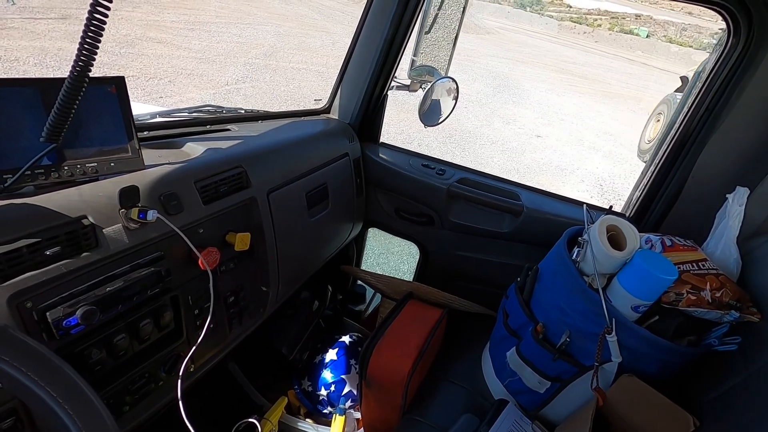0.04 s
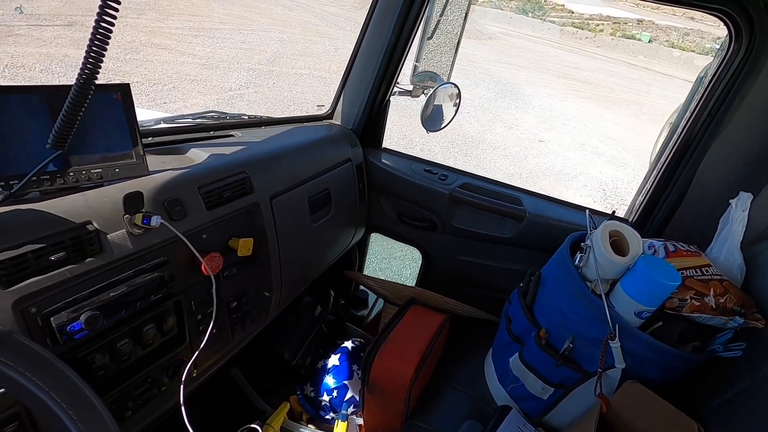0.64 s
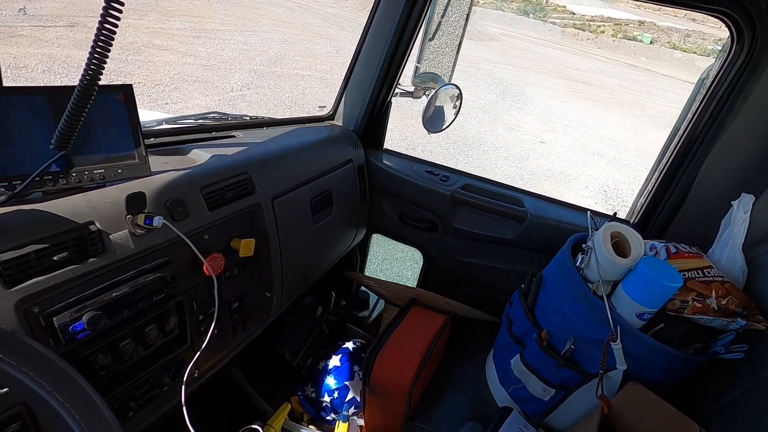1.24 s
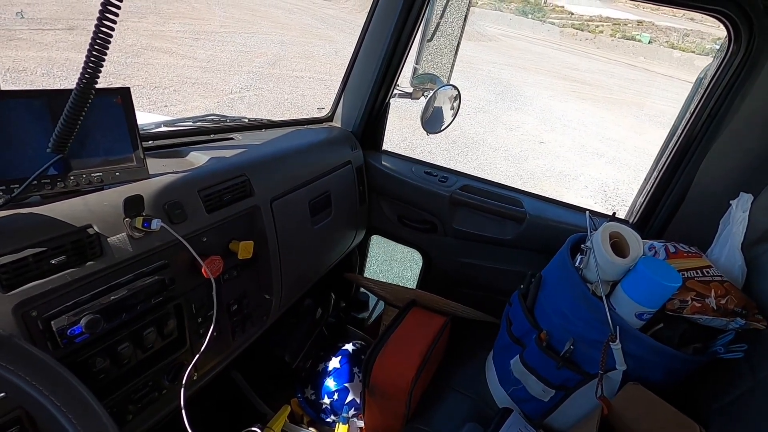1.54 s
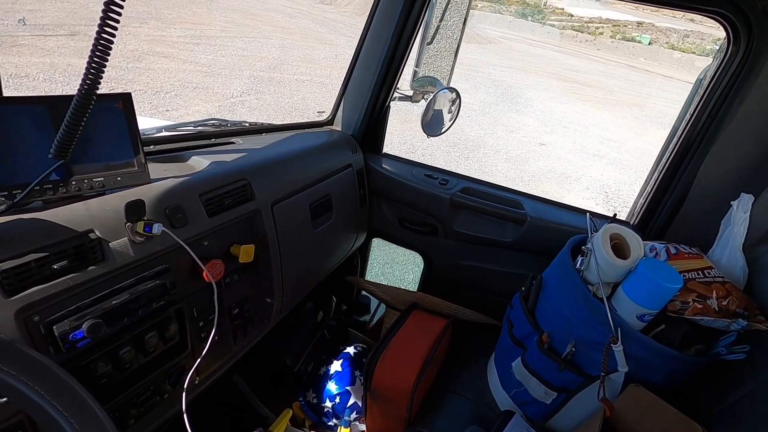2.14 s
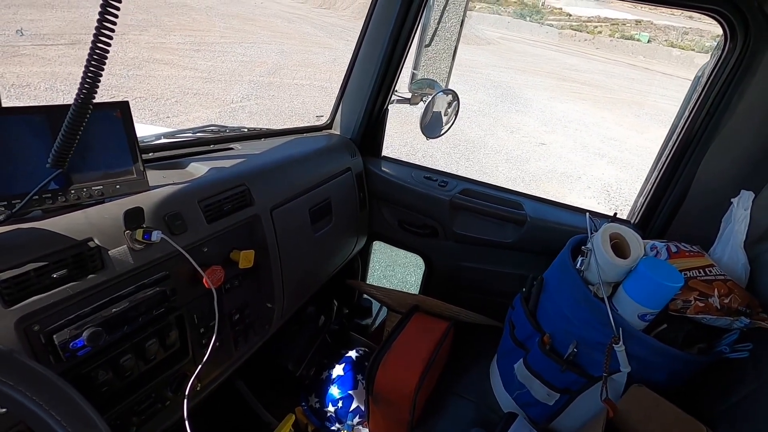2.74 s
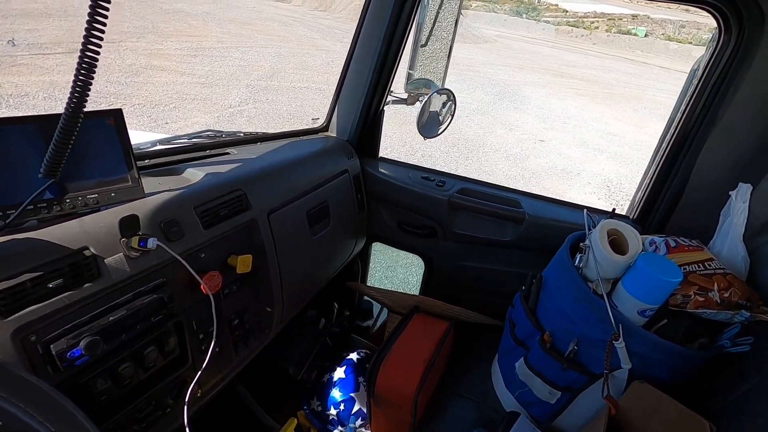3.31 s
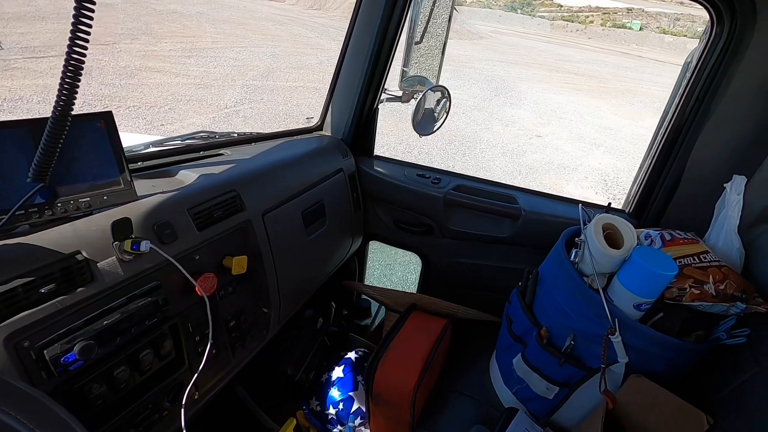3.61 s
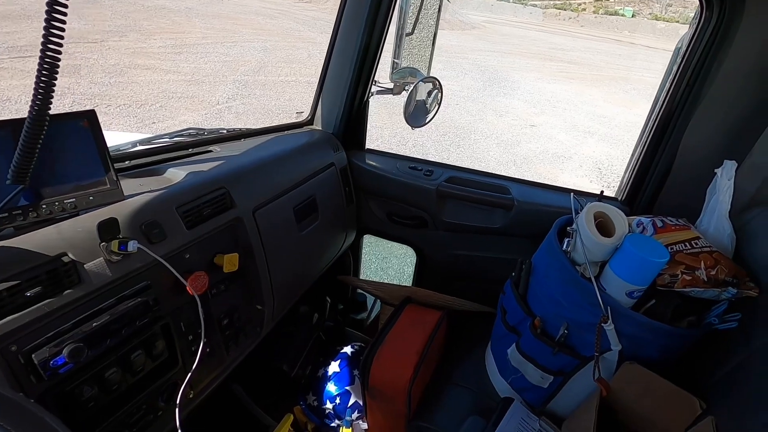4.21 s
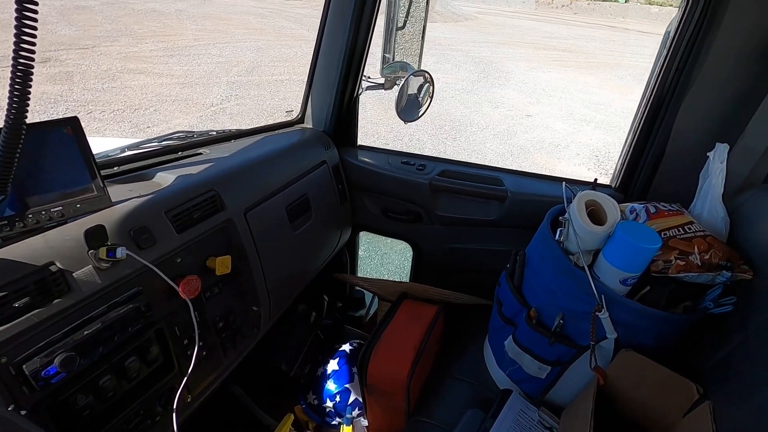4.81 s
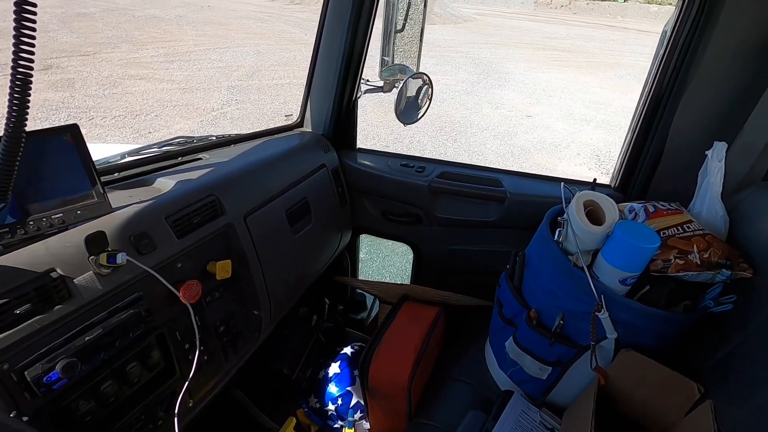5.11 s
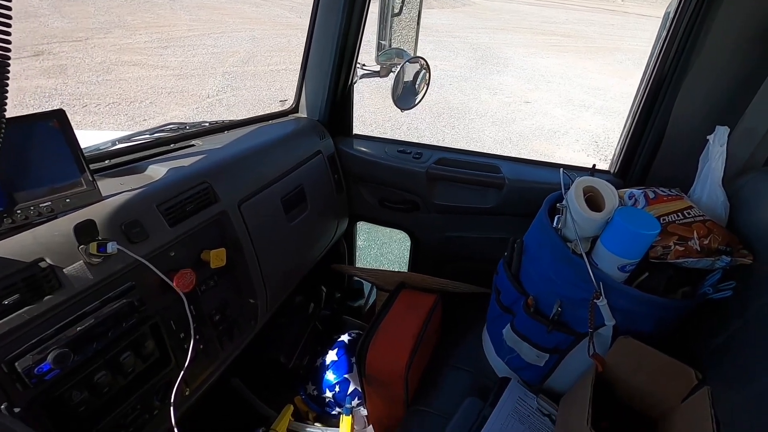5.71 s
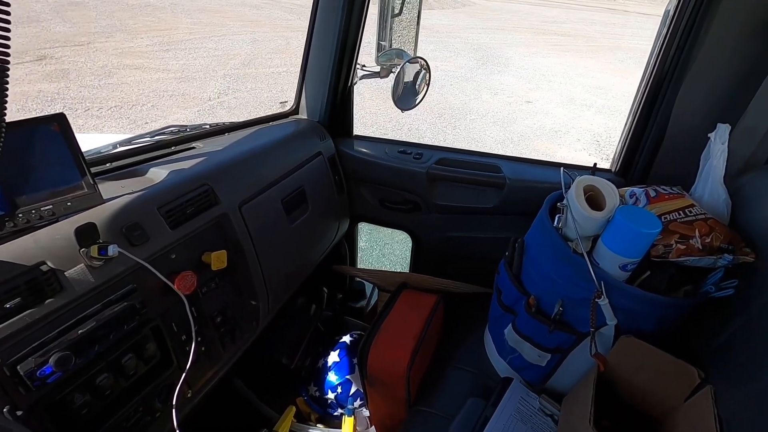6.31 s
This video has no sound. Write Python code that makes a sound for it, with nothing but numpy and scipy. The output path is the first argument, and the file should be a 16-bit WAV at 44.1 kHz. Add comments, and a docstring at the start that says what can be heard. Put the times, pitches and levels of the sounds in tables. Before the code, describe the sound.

A heavy diesel truck idles, heard from within the cab as a booming low hum with regular knocking and faintly ringing panels. Underneath, a nearby loader's engine drops in revs and picks up a little. Loose items give a soft knock, a rustle and scattered light ticks. Late on, a cooling fan engages with a low whoosh, and a close, fluttering air hiss builds.

```python
"""A six-cylinder diesel truck idles at a gravel pit, heard from inside the cab.
Its firings boom low, knock through the firewall and ring the block and panels; one cylinder is loudest.
A loader works nearby: its exhaust drone sinks and rises and beats against the truck's own firing note.
Loose things tick, rustle and knock in the cab. Near the end a fan cuts in and drags the idle for a
moment, and air starts to hiss through a valve and pipe."""
import sys
import numpy as np
from scipy import signal
from scipy.fft import rfft, irfft
from scipy.io import wavfile
from scipy.ndimage import uniform_filter1d

SR = 44100
rng = np.random.default_rng(int(sys.argv[2]) if len(sys.argv) > 2 else 0)


def digitize_waveform(pressure):
    """Quantize a signal to 16-bit integers and store it at the path in sys.argv[1].

    Rows of a 2-D input are taken as channels; values are limited to [-1, 1].
    """
    field = np.atleast_2d(pressure).T
    bounded = np.clip(field, -1, 1)
    quanta = np.round(bounded * 32767).astype(np.int16)
    wavfile.write(sys.argv[1], SR, quanta)


N = 280035
T, HZ = np.arange(N) / SR, np.maximum(np.fft.rfftfreq(N, 1 / SR), 1)
SIDES = np.array([[.5], [-.5]])   # splits a difference between left and right
CYLINDERS = 6


def from_db(db):
    """Decibels to gain."""
    return 10 ** (np.asarray(db) / 20)


def rms_one(x):
    """Scale to rms 1."""
    return x / np.sqrt(np.mean(x ** 2) + 1e-20)


def lookup(x, curve, left=None):
    """Read a breakpoint curve at x."""
    return np.interp(x, *np.transpose(curve), left=left)


def by_hz(curve):
    """An EQ curve at every frequency, straight on a log axis."""
    hz, value = np.transpose(curve)
    return np.interp(np.log(HZ), np.log(hz), value)


def envelope(start_s, attack_s, hold_s, release_s):
    """Rise, hold, then die away."""
    age = T - start_s
    return np.clip(age / attack_s, 0, 1) * np.exp(-np.maximum(age - attack_s - hold_s, 0) / release_s)


def drift(rate_hz):
    """A smooth random modulator of rms 1."""
    return rms_one(irfft(rfft(rng.standard_normal(N)) / (1 + (HZ / rate_hz) ** 4), N))


def white():
    """Two unrelated white noises."""
    return rng.standard_normal((2, N))


# stereo image in the cab: f/Hz, left-right correlation
LIKENESS = [(80, 1), (150, .99), (350, .97), (640, .92), (1200, .9), (2900, .87), (4500, .35), (10000, .05)]
def colour(source, eq=None):
    """Shape two noises into a stereo pair of rms 1, centred in the bass and wide in the treble."""
    mid, side = rfft(source)
    alike = by_hz(LIKENESS)
    pair = np.sqrt(1 + alike) * mid + np.sqrt(1 - alike) * side * [[1], [-1]]
    return rms_one(irfft(pair * (from_db(by_hz(eq)) if eq else 1), N))


def noise(eq=None):
    """Steady stereo noise."""
    return colour(white(), eq)


def resonate(drive, modes):
    """Parallel resonators, each at its own rms level; two stages keep the valleys dark."""
    out = 0
    for hz, width_hz, level_db in modes:
        ring = drive
        for width in (width_hz, 5 * width_hz):
            r = np.exp(-np.pi * width / SR)
            ring = signal.lfilter([1, 0, -1], [1, -2 * r * np.cos(2 * np.pi * hz / SR), r * r], ring)
        out = out + from_db(level_db) * rms_one(ring)
    return out


def shaken(modes, shake):
    """Each mode wanders in pitch about its centre and swells with the shaking."""
    out = 0
    for hz, width_hz, level_db in modes:
        phase = 2 * np.pi * np.cumsum(hz + width_hz / 2 * drift(width_hz)) / SR
        out = out + from_db(level_db + 1.8 * drift(35)) * np.sqrt(2) * np.sin(phase)
    return out * shake


# the truck's idle, sagging as the fan grips: t/s, firing rate/Hz
IDLE = [(0, 38.75), (5.1, 38.75), (5.22, 37.3), (5.35, 38.75), (5.5, 39.5), (5.85, 39.45), (6.0, 38.9),
        (6.35, 38.85)]
def crankshaft(first_firing_s=.009):
    """The engine's clock: firing rate and running count of firings."""
    rate = lookup(T, IDLE)
    return rate, np.cumsum(rate) / SR - first_firing_s * rate[0]


def bursts(firings, cylinder_db, decay, rise, uneven_db=2):
    """Each firing swells and dies away, as strong as its cylinder; times in firing intervals."""
    number, age = np.floor(firings).astype(int), firings % 1
    count = number.max() + CYLINDERS
    strength = from_db(np.resize(cylinder_db, count) + uneven_db * rng.standard_normal(count))
    shape = lambda a: np.exp(-a / decay) * (1 - np.exp(-a / rise))
    return rms_one(sum(strength[number - k] * shape(age + k) for k in range(3)))


def contacts(firings, share):
    """Contacts come back at the same crank angles every cycle; the rest of the noise is fresh."""
    loop_sample = (firings % CYLINDERS * SR / IDLE[0][1]).astype(int)
    return share * white()[:, loop_sample] + (1 - share) * white()


# partials of the hum: multiple of the four-stroke cycle rate, level/dB
HUM_ORDERS = [(3, -35), (4, -39), (6, -22.5), (12, -31), (18, -51), (21, -53), (30, -52.5), (54, -52.5),
              (60, -58.5), (90, -58), (95, -60.5)]
def truck_hum(firings, load):
    """The firing pulses boom in the cab as nearly pure engine orders, a touch softer under load."""
    cycle, out = firings / CYLINDERS, 0
    for order, level_db in HUM_ORDERS:
        waver_db = (.95 if order < 15 else 2.5) * drift(3.1)
        out = out - from_db(level_db + waver_db) * np.sqrt(2) * np.cos(2 * np.pi * order * cycle)
    return from_db(-1.03 - .7 * load) * out


# accents in firing order: knock level/dB, block ring level/dB, panel boom level/dB
ACCENTS = [(-11, -3, 0), (-3.5, -5, -2), (-8, 1.5, -3.5), (3, 0.5, -4.5), (-5.5, 0.5, -1.5),
           (-4.5, -4, -4.5)]
# EQ of the combustion knock and of the running gear: f/Hz, level/dB
KNOCK_EQ = [(150, 4.5), (600, 3.5), (1500, 0.5), (2500, -10.5), (3400, -6), (4400, -7), (6500, -17),
            (7300, -19), (8100, -41.5), (13500, -59)]
GEAR_EQ = [(100, -1), (160, 1.5), (210, 3.5), (270, 1), (310, -5), (470, -1.5), (600, -3), (800, -4.5),
           (1200, -6), (1800, -12.5), (3200, -14), (4200, -21.5), (6300, -26.5), (8500, -44.5),
           (13500, -60)]
# resonances of injectors, block and panels: f/Hz, width/Hz, level/dB
INJECTOR_MODES = [(3400, 170, -62), (4980, 240, -73.5), (6430, 300, -73), (7250, 140, -82.5)]
BLOCK_MODES = [(1048, 30, -49.5), (965, 14, -59.5), (1099, 60, -55.5), (1252, 44, -64), (1614, 25, -71),
               (2210, 40, -67.5), (2410, 70, -61), (2557, 16, -71), (2740, 45, -72), (3010, 45, -71)]
PANEL_MODES = [(268.1, 40, -54), (393.3, 14.73, -53.5), (430.4, 42, -51.5), (551, 10, -57), (659, 20, -55)]
# now and then the loud cylinder fires harder: t/s, injector boost/dB
HARD_FIRINGS = [(.081, 3.5), (.39, 6), (1.01, 4), (1.475, 3), (1.63, 5.5), (2.868, 5), (3.178, 5)]
def truck_clatter(firings):
    """Combustion knocks through the firewall, injectors tick, and block and panels ring."""
    knock_db, ring_db, boom_db = np.transpose(ACCENTS)
    early = firings + .12   # knock and tick lead the boom
    blows = contacts(early - .12, share=.34) * bursts(early, knock_db, decay=.83, rise=.12)
    knock = from_db(-52) * colour(blows, KNOCK_EQ)
    ticks = noise() * bursts(early, knock_db, decay=.62, rise=.14, uneven_db=1)
    boost_db = sum(db * envelope(s, .002, .02, .012) for s, db in HARD_FIRINGS)
    injectors = from_db(boost_db) * resonate(ticks, INJECTOR_MODES)
    block = from_db(.8) * shaken(BLOCK_MODES, bursts(firings, ring_db, decay=.6, rise=.3))
    panels = shaken(PANEL_MODES, bursts(firings, boom_db, decay=.96, rise=.2, uneven_db=1.5))
    running_gear = from_db(-39) * colour(contacts(firings, share=.31), GEAR_EQ)
    return knock + injectors + block + panels + running_gear


# struck modes of block and covers: f/Hz, level/dB, t60/s, place in the cycle/firings
STRUCK_MODES = [(815, -52, .12, 3.15), (952, -45.5, .18, 3.15), (1050, -46, .16, 3.15),
                (1160, -46.5, .15, 3.15), (1485, -53, .12, 3.15), (2205, -53.5, .12, 3.02),
                (2345, -52.5, .1, 3.02), (2425, -48, .1, 3.02), (2790, -52, .13, 3.02),
                (4260, -60, .1, 2.97), (4440, -65, .1, 2.97), (5200, -66, .1, 2.97),
                (6280, -63.5, .13, 2.97), (6450, -63, .13, 2.97), (7250, -70, .13, 2.97)]
def loud_cylinder(firings, rate, blow_db=1.5, uneven_db=2, slip_rad=.5, attack_s=.001):
    """Once a cycle the same blow strikes block and covers, never quite equal in level or phase."""
    out = 0
    for k, (hz, level_db, t60, place) in enumerate(STRUCK_MODES):
        cycle, since = np.divmod(firings - place + CYLINDERS, CYLINDERS)
        number, age = cycle.astype(int), since / rate
        strength, slip = rng.standard_normal((number.max() + 1, 2)).T
        level = from_db(blow_db + level_db + uneven_db * strength[number] - 60 * age / t60)
        spread = (-1) ** k * np.arccos(lookup(hz, LIKENESS)) * SIDES   # higher modes sit wider
        ring = np.sin(2 * np.pi * hz * age + slip_rad * slip[number] + spread)
        out = out + level * np.minimum(age / attack_s, 1) * ring
    return out


# tones of panels and covers: idle f/Hz, loaded f/Hz, place in the cycle/firings, length/firings,
# idle level/dB, loaded level/dB
PANEL_TONES = [(337, 338, 4.0, 5.5, -57.5, -52), (388.5, 395, 4.1, 3.2, -49.5, -52),
               (582, 574, 3.2, 4.0, -58, -58), (657, 664, 2.95, 3.4, -56.5, -58),
               (1059, 1041, 3.5, 4.6, -57, -49.3), (1262, 1245, 3.7, 6.0, -66, -55)]
def singing_panels(firings, rate, load, wander_rad=.5, waver_db=1.6):
    """Each panel swells into a soft tone once a cycle; the fan's load shifts pitch and level."""
    out = 0
    for idle_hz, loaded_hz, place, length, idle_db, loaded_db in PANEL_TONES:
        offset = (firings - place + CYLINDERS / 2) % CYLINDERS - CYLINDERS / 2
        swell = np.cos(np.pi * np.clip(offset / length, -.5, .5))
        hz = idle_hz + (loaded_hz - idle_hz) * load
        tone = np.sin(2 * np.pi * hz * offset / rate + wander_rad * drift(28))
        level_db = idle_db + (loaded_db - idle_db) * load + waver_db * drift(23)
        out = out + from_db(level_db) * rms_one(swell * tone)
    return out


# the loader's revs: t/s, firing rate/Hz
LOADER_REVS = [(0.0, 77.59), (0.68, 78.08), (1.12, 75.0), (1.51, 74.68), (1.79, 71.3), (2.07, 71.41),
               (2.82, 48.36), (3.39, 40.89), (3.74, 43.34), (4.29, 57.61), (4.88, 52.69), (6.04, 52.81),
               (6.35, 58.01)]
# the cab's response to its exhaust, and EQ of its machinery: f/Hz, level/dB
CAB_BOOM = [(41, -18), (47, -19), (53, -20), (60, -20.5), (71, -17.5), (78, -23), (92, -23), (106, -23.5),
            (125, -33), (156, -37.5)]
MACHINERY_EQ = [(60, -3.5), (130, 4.5), (260, -2.5), (500, -5.5), (1000, -13.5), (2000, -15), (3500, -19),
                (7000, -48.5), (12000, -65)]
def loader(octave_db=-13.5, throttle_lag_s=.24, first_firing_s=.0044):
    """The exhaust note and its octave swell on the cab's resonances; machinery noise rides the revs."""
    rate = lookup(T, LOADER_REVS)
    slowing_hz_per_s = np.maximum(-np.gradient(rate) * SR, 0)
    duck_db = .13 * uniform_filter1d(slowing_hz_per_s, int(throttle_lag_s * SR))   # quieter coasting
    boom = lambda hz: np.sqrt(2) * from_db(lookup(hz, CAB_BOOM) - duck_db + .5 * drift(4.2))
    phase = 2 * np.pi * (np.cumsum(rate) / SR - first_firing_s * rate[0])
    note = boom(rate) * np.cos(phase)
    octave = from_db(octave_db) * boom(2 * rate) * np.cos(2 * phase)
    machinery = from_db(-43 + 11.5 * np.log2(rate / rate.max())) * noise(MACHINERY_EQ)
    return note + octave + machinery


# EQ of the low bed: f/Hz, level/dB
RUMBLE_EQ = [(15, -21.5), (28, -8.5), (42, -3.5), (60, 2.5), (92, 4.5), (115, -3), (145, -12), (200, -28),
             (400, -54), (2000, -100)]
def rumble():
    """A steady bed of low noise under both engines."""
    return from_db(-31) * noise(RUMBLE_EQ)


# ticks and rattles: t/s, level/dB, low f/Hz, high f/Hz, tilt/dB per octave, attack/s, decay/s
TICKS = [(2.401, -64.5, 11000, 13200, 0, .0005, .004), (2.655, -45, 1400, 3300, 0, .008, .018),
         (2.812, -44.5, 1400, 3300, 0, .008, .018), (3.889, -53, 3500, 7600, -4, .012, .022),
         (3.890, -68, 7600, 14000, -22, .012, .02), (4.594, -68, 5500, 11000, -8, .002, .015),
         (4.733, -52, 2500, 5200, 0, .002, .012), (4.822, -38, 1200, 6000, -3, .002, .014),
         (4.845, -51, 3000, 5800, 0, .001, .008), (5.204, -44, 2800, 4000, 0, .002, .008),
         (5.672, -49, 4500, 7500, 0, .002, .012)]
# EQ of the rustle: f/Hz, level/dB
RUSTLE_EQ = [(300, -18.5), (900, -9.5), (2200, 4), (3300, -4.5), (5000, -23), (12000, -54.5)]
def loose_things():
    """Loose things tick and rattle, each a dry burst in its own band; a faint rustle trails the knock."""
    swell = envelope(start_s=2.5, attack_s=.09, hold_s=.55, release_s=.074)
    out = swell * from_db(-52 + 2.5 * drift(15)) * noise(RUSTLE_EQ)
    grain = rfft(noise())
    for s, level_db, low_hz, high_hz, tilt_db, attack_s, decay_s in TICKS:
        band = (HZ > low_hz) * (HZ < high_hz) * from_db(tilt_db * np.log2(HZ / low_hz))
        tick = envelope(s, attack_s, 0, decay_s) * rms_one(irfft(grain * band, N))
        out = out + from_db(level_db) * tick
    return out


# a hit and its bounce: t/s, level/dB
TRIM_HITS = [(2.5025, -27), (2.5077, -27.5)]
# modes of the trim: f/Hz, level/dB, t60/s
TRIM_MODES = [(210, -4, .035), (340, -2, .022), (540, 0, .014), (950, -1, .012), (1500, -3, .007),
              (2450, -3, .007)]
def trim_knock(contact_s=.0005):
    """Something knocks softly on the cab's trim and bounces, ringing its well-damped modes."""
    out = 0
    for s, level_db in TRIM_HITS:
        age = np.maximum(T - s, 0)
        contact = np.sin(np.pi / 2 * np.minimum(age / contact_s, 1)) ** 2
        for hz, mode_db, t60 in TRIM_MODES:
            level = from_db(level_db + mode_db - 60 * np.minimum(age / t60, 3))
            out = out + contact * level * np.sin(2 * np.pi * hz * age)
    return out


def fan_clutch(on_s=4.95, spin_up_s=.099):
    """The clutch grips and the fan settles at full speed: 0 to 1."""
    return 1 - np.exp(-np.maximum(T - on_s, 0) / spin_up_s)


# EQ of the fan's air wash: f/Hz, level/dB
FAN_EQ = [(60, 3), (110, -0.5), (230, -0.5), (420, -4), (800, -27), (2000, -18.5), (10000, -65)]
def fan(speed, blade_hz=152.5, shudder_hz=34.4):
    """A blade note, a wash of air and a low shudder of the cab, all growing with the fan's speed."""
    level_db = -43 + 8.5 * np.log2(speed + 1e-9)
    note = np.sqrt(2) * np.sin(2 * np.pi * np.cumsum(blade_hz * speed) / SR)
    shudder = np.sqrt(2) * np.sin(2 * np.pi * shudder_hz * T)
    return from_db(level_db) * (note + shudder + from_db(5) * noise(FAN_EQ))


# air flow as the valve opens up: t/s, level/dB
AIR_FLOW = [(5.605, -49), (5.655, -45), (5.72, -42.5), (5.895, -41), (5.905, -36.7), (6.219, -36.5),
            (6.3, -38.5)]
# resonances of the pipe: f/Hz, width/Hz, level/dB
PIPE_MODES = [(2700, 170, -1.5), (2990, 200, -2.5), (3460, 230, -5), (4450, 130, -10.5), (5490, 150, -11.5),
              (6290, 100, -13.5), (7280, 140, -16), (8370, 100, -25), (9220, 100, -27.5), (10200, 180, -31),
              (11300, 150, -37), (12230, 150, -34.5)]
# EQ of the jet: f/Hz, level/dB
JET_EQ = [(300, -35), (1200, -25), (2200, -18.5), (2900, 5), (4000, -6.5), (6500, -22), (8000, -41),
          (13500, -45)]
def air_valve(on_s=5.1, opening_s=.12, leak_db=-52):
    """A valve leaks, spits once, then opens up; its fluttering jet rings a short pipe close by."""
    flow = from_db(lookup(T, AIR_FLOW, left=leak_db)) * np.clip((T - on_s) / opening_s, 0, 1)
    puff = envelope(start_s=5.532, attack_s=.008, hold_s=.03, release_s=.012)
    spit = from_db(-40) * puff * resonate(noise(), PIPE_MODES[:2])
    pipe = resonate(white()[0] + 1.15 * noise(), PIPE_MODES)   # part direct, part scattered by the cab
    flutter = from_db(-3.5 + .61 * drift(25))
    jet = from_db(-2) * noise(JET_EQ)
    return flutter * (flow * (pipe + jet) + spit)


# fader ride on the clatter: t/s, level/dB
CLATTER_RIDE = [(0, 0.44), (2.2, -1.5), (2.9, 0.4), (3.8, -1.5), (5.2, -1), (6.35, 0)]
# pan by frequency: f/Hz, left minus right level/dB
PAN = [(60, 1), (260, 0.5), (600, 3), (1000, 4), (2500, 5.5), (4000, 3.5), (6000, 3), (9000, -8),
       (13000, -5)]
def scene():
    """Everything meets in the cab and reaches the left side a little later and mostly louder."""
    rate, firings = crankshaft()
    load = fan_clutch()
    hum = truck_hum(firings, load)
    clatter = from_db(lookup(T, CLATTER_RIDE)) * (truck_clatter(firings) + loud_cylinder(firings, rate))
    truck = hum + clatter + singing_panels(firings, rate, load)
    cab = truck + loader() + rumble() + loose_things() + trim_knock() + fan(load) + air_valve()
    fade = np.clip(np.minimum(T, T[-1] - T) / .002, 0, 1)
    lag_s = 5.5e-5
    placement = from_db(SIDES * by_hz(PAN)) * np.exp(-2j * np.pi * HZ * lag_s * SIDES)
    return irfft(rfft(cab * fade) * placement, N)


def record(dry, cutoff_hz=14200):
    """A steep low-pass takes off the top."""
    return signal.sosfilt(signal.ellip(10, .1, 80, cutoff_hz, fs=SR, output="sos"), dry)


dry = scene()
out = record(dry)
digitize_waveform(out)
```